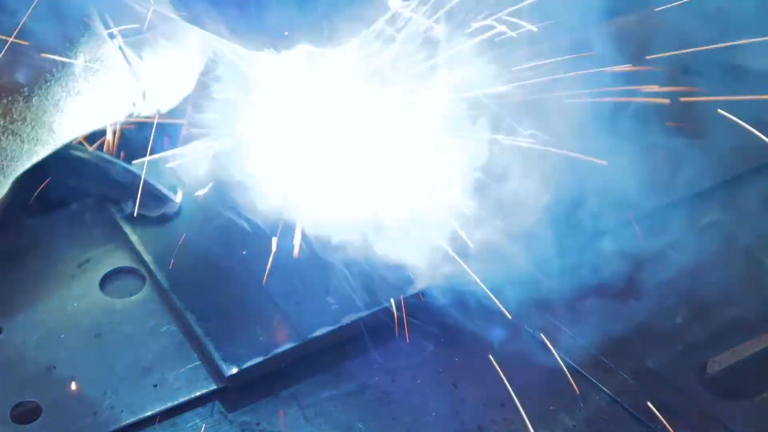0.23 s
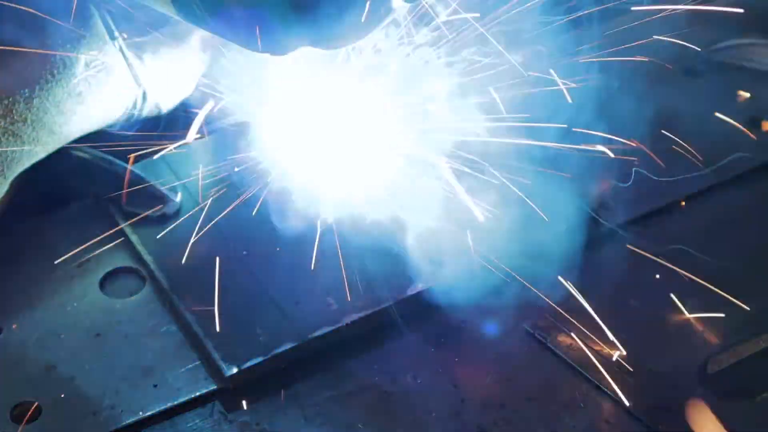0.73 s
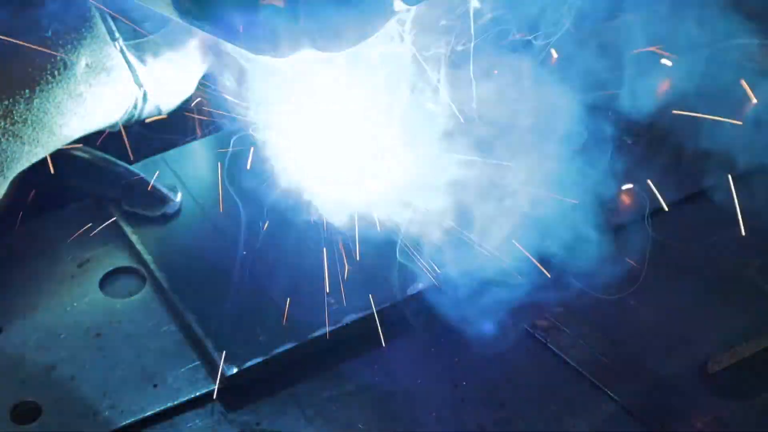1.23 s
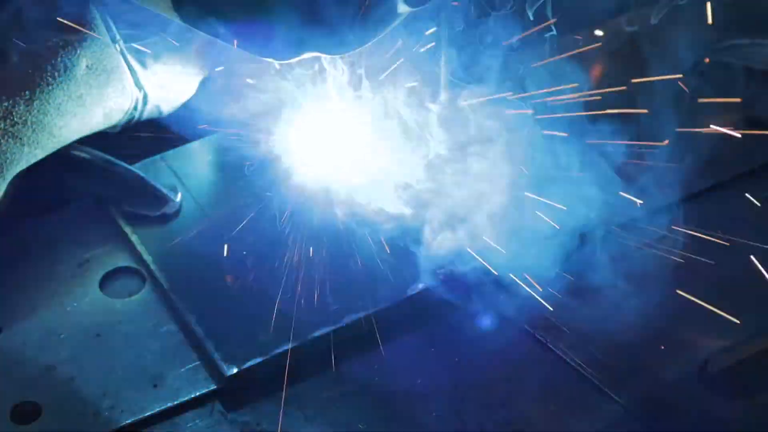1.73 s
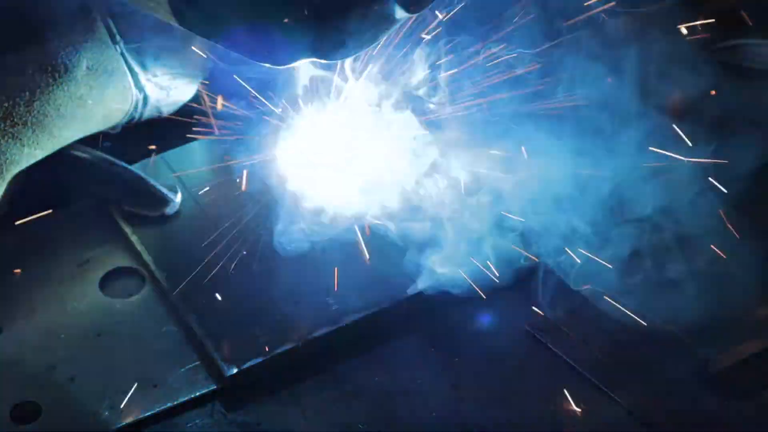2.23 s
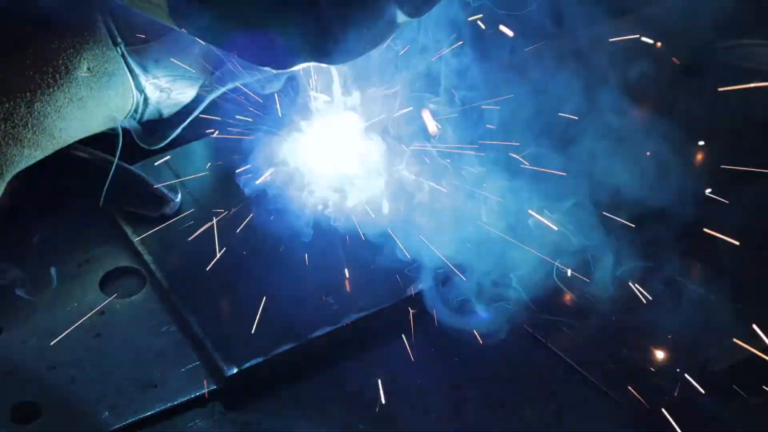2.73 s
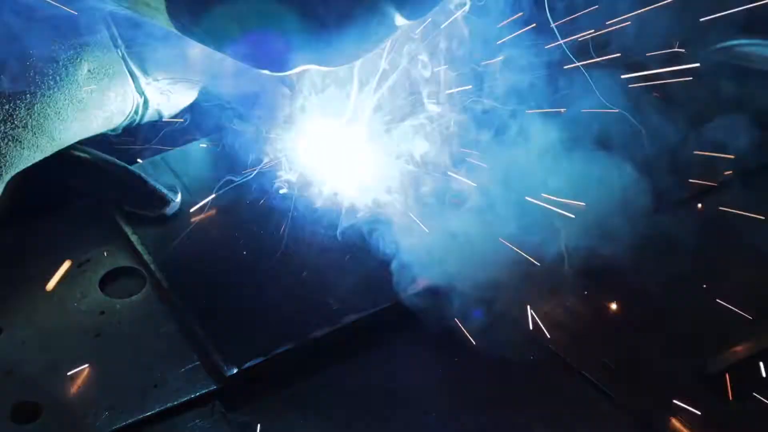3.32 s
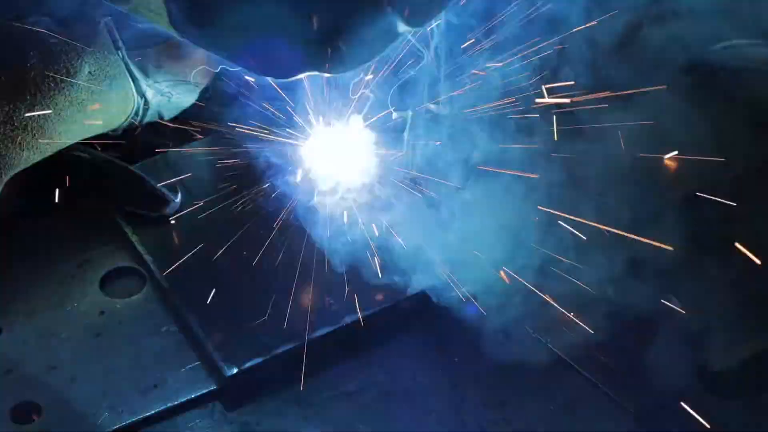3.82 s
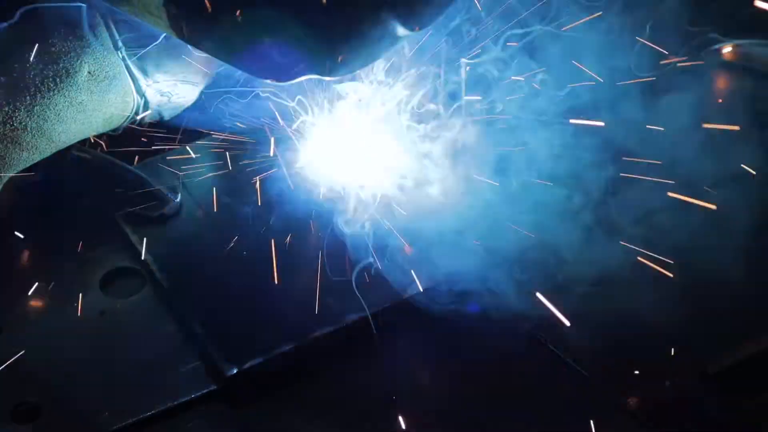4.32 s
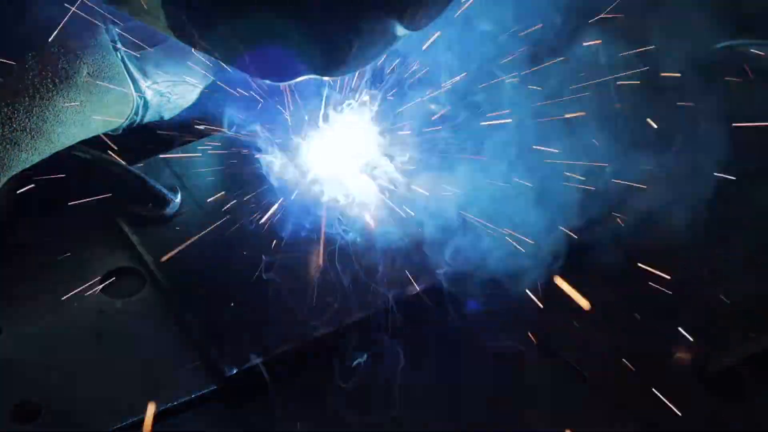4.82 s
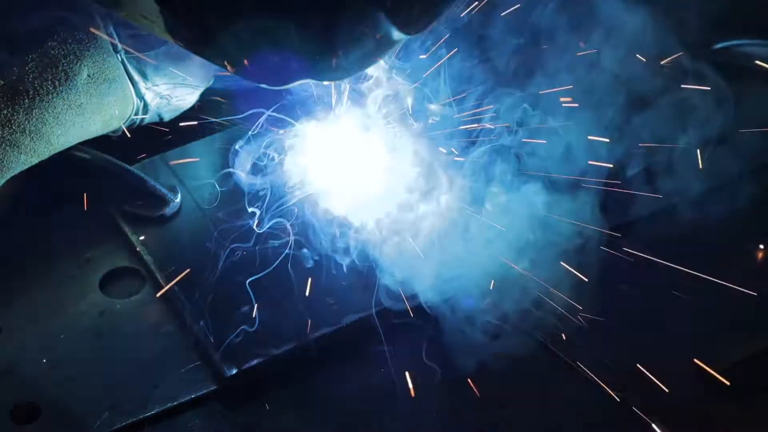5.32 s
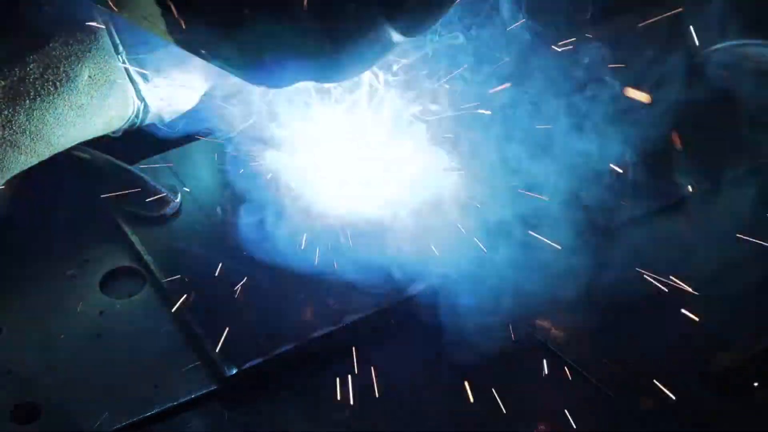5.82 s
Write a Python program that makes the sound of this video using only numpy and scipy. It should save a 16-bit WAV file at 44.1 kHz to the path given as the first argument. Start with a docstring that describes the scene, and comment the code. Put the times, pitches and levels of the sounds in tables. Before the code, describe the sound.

A close welding arc crackles and sizzles with irregular dull pops, cuts out for an instant, then resumes with steadier, brighter frying.

```python
"""A workshop, close to a MIG welder laying a bead along a steel joint.
The wire keeps shorting into the pool: each re-ignition is a dull pop with a hard crack, and the pool
rocks, bubbles and rumbles. Between pops the arc spits and sizzles in quick bursts, droplets snap off
the wire and spatter ticks on the steel. After one dead stop the arc strikes again into a steadier,
brighter frying. Faint room tail and air lie behind."""
import sys
import numpy as np
from scipy import signal
from scipy.fft import irfft
from scipy.io import wavfile
from scipy.ndimage import uniform_filter1d, map_coordinates

SR = 44100
rng = np.random.default_rng(int(sys.argv[2]) if len(sys.argv) > 2 else 0)


def store_wav(level_fs):
    """Save 16-bit WAV to argv[1]."""
    pcm = np.round(np.clip(np.atleast_2d(level_fs), -1, 1) * 32767)
    wavfile.write(sys.argv[1], SR, pcm.T.astype(np.int16))


N = 267687
TIME = np.arange(N) / SR
DEAD_S, RESTRIKE_S = 4.692, 4.723
IS_STEADY = TIME > RESTRIKE_S


# Each row: start in seconds, body level in dB, left minus right in dB, crack level in dB.
REIGNITIONS = [(0.0196, -21.5, 5, -59), (0.0435, -19.5, -3, -30), (0.0829, -13, -3.5, -27),
               (0.1104, -10.5, 5, -30.5), (0.1153, -18.5, -5.0, -40), (0.1294, -18, 0, -28),
               (0.1437, -14, -16, -32), (0.264, -17, -0.5, -30), (0.3074, -15.5, 7, -29),
               (0.314, -22, -12, -39), (0.3231, -12.5, -2, -28.5), (0.3543, -16.5, -4, -34),
               (0.3602, -20, -4, -30.5), (0.447, -15, 3, -32.5), (0.4519, -13, -2, -36),
               (0.4543, -14.5, 0, -25.5), (0.561, -22.5, 9, -50), (0.5844, -21.5, 13, -45),
               (0.5886, -19.5, 10.0, -39), (0.6623, -18, 6.5, -31), (0.6692, -21, 1, -38),
               (0.8365, -17.5, 3, -46), (0.8793, -13, 1, -32), (0.907, -14.5, 0.0, -28),
               (0.934, -21, -7, -37), (0.942, -26, 7, -43), (1.0493, -23, 7.0, -49), (1.0716, -12, -1, -33),
               (1.1297, -23, -4, -40), (1.1408, -22, -8, -32.5), (1.2647, -18.5, 9, -41),
               (1.3812, -22, 10, -47), (1.4843, -24, -7, -29.5), (1.519, -18, 5, -32.5),
               (1.5718, -22, 4, -38), (1.6249, -16, 5, -28.5), (1.666, -11, 2, -25.5),
               (1.6717, -21, -6, -27), (1.6877, -16.5, -2.0, -36), (1.7222, -19, 5, -24),
               (1.73, -13.5, -3.5, -24), (1.764, -17, -2, -24), (1.768, -11, -1, -24.5),
               (1.792, -14, -11, -32), (1.8173, -12.5, 4.5, -27.5), (1.8199, -13.5, 2, -31),
               (1.8533, -14.5, -1.5, -30), (1.8758, -22, -3.0, -50), (1.9161, -18, -1, -38),
               (1.9674, -11.5, -0.5, -27.5), (1.9897, -20, -6, -28), (2.0052, -14.5, 1, -27.5),
               (2.027, -24, -5, -42), (2.0815, -14, -1, -33), (2.2059, -22, -2, -42),
               (2.2469, -13.5, -2.5, -31), (2.2483, -11.5, 9, -30), (2.255, -25, -4, -41),
               (2.2651, -22, 10, -32), (2.272, -21, 9, -36), (2.3195, -15.5, 5, -34),
               (2.3241, -18.5, 5, -27), (2.3704, -23, 6, -35), (2.3931, -17.5, -1, -33),
               (2.409, -14.5, 4, -26), (2.4127, -16.5, 1, -36), (2.607, -19.5, -5, -22.5),
               (2.657, -20, -1.0, -35), (2.6654, -20.5, -4, -28), (2.6816, -11.5, 2.5, -28.5),
               (2.9111, -13, 7.5, -30), (2.9195, -18, -17, -31), (2.9454, -18, 0.0, -29.0),
               (2.9503, -18, -8, -26.5), (3.0342, -15, 0.5, -28.5), (3.0673, -10.5, 2.5, -26.5),
               (3.1034, -15.5, 1.5, -31), (3.1066, -23, 7, -29.5), (3.1333, -23.5, 3, -32),
               (3.1805, -18.5, 7, -30), (3.24, -20, 1, -48), (3.2775, -20.5, 1.5, -58),
               (3.3566, -15.5, -15, -43), (3.4298, -23, 5, -36), (3.5986, -13, -2, -24.5),
               (3.6486, -24.5, 7, -27), (3.6786, -15.5, 1, -21), (3.708, -11.5, 4, -26),
               (3.7569, -13.5, 4, -20), (3.797, -15, 0, -27), (3.8005, -8.5, 3, -25.5),
               (3.8142, -21, 3, -28), (3.9211, -21.5, -6, -29), (3.9292, -17.5, 6, -25),
               (3.935, -19, -28, -36.0), (3.9819, -19, -2.5, -26), (4.0665, -15.5, 6, -21),
               (4.0719, -15, 6.0, -30), (4.1099, -11.5, 5.5, -29.5), (4.1258, -20.5, 7, -27.5),
               (4.2136, -18, 1.5, -29.5), (4.3216, -17.5, 0, -20), (4.3812, -25, 6, -32),
               (4.3996, -20, 5, -30.5), (4.4456, -18, 0, -30), (4.4572, -18.5, 4, -28),
               (4.4736, -15.5, 2, -28.5), (4.5585, -11, 0.5, -23.5), (4.602, -13, -2.5, -24),
               (4.6126, -28, 4, -24.5), (4.6328, -18, -1, -28), (4.639, -14, 8, -28.5),
               (4.683, -16, 0.5, -32.5), (4.7249, -14, 8, -27), (4.7598, -20.5, -2, -29),
               (4.7755, -16.5, 4, -27), (4.7802, -12, 4.0, -22), (4.788, -14.5, -5, -33),
               (4.806, -14.5, 0, -25), (4.8102, -14, 6, -24), (4.8443, -22, 15, -27.5),
               (4.8907, -20, 4, -40), (4.9011, -24, 14, -33), (4.935, -19, 6, -35.0),
               (4.9395, -25, 15, -27), (4.9482, -13, 4, -29), (4.9589, -16, -5, -27),
               (4.9736, -19, -3, -30), (5.0026, -19.5, 4, -22.5), (5.0962, -18.5, -4.5, -35),
               (5.0993, -16.5, -1.5, -26), (5.1328, -19.5, -3.0, -28.5), (5.1781, -15.5, -3, -30),
               (5.2541, -18.5, 1.5, -27.5), (5.332, -16, -0.5, -30.5), (5.461, -19, 6, -27),
               (5.466, -22, -2, -33), (5.5128, -17, -1.5, -28), (5.5361, -21, 0.0, -37),
               (5.546, -27, 0, -40), (5.7567, -28.5, -5, -41), (5.8135, -23, -5, -38),
               (5.8858, -19, -3, -31.5), (5.906, -25.5, 0, -41)]

def pops(crack_db=-0.5, delay_s=0.00024, rock_db=-16, rock_s=0.009):
    """Each re-ignition swells and cracks; a softer pop follows as the pool rocks back."""
    out = np.zeros((2, N))
    draws = rng.standard_normal((len(REIGNITIONS), 12, 2))
    for (start, db, pan_db, edge_db), draw in zip(REIGNITIONS, draws):
        pop = swell(draw[:4], db) + crack(draw[9:], edge_db + crack_db)
        add(out, start + delay_s, panned(pan_db) * pop)
        late, size = np.clip(draw[8], -2, 2)
        add(out, start + rock_s * np.exp(late / 2), swell(draw[4:8], db + rock_db + 2 * size))
    return out


def small_pops(level_db=7, crack_db=-13, gap_s=0.025, spread_db=3, pan_db=3, pan_spread_db=4):
    """Lesser re-ignitions at uneven intervals, as strong as the pool is lively."""
    out, draws = np.zeros((2, N)), rng.standard_normal((300, 9, 2))
    starts = np.cumsum(gap_s * np.exp(0.7 * draws[:, 5, 0]))
    for start, draw in zip(starts, draws):
        size, side = np.clip(draw[4], -2, 1.5)
        db = np.interp(start, *np.transpose(POOL_ACTIVITY)) + level_db + spread_db * size
        pop = swell(draw[:4], db) + crack(draw[6:], db + crack_db)
        add(out, start, panned(pan_db + pan_spread_db * side) * pop)
    return out


def swell(draw, db, mid_turn_hz=480, lag_spread_s=0.00033, echo=0.4, echo_s=0.001396):
    """Body of a pop: it reaches each side with its own shape and echo off the steel."""
    size, turn, bounce, path = np.clip(draw, -2, 2)[:, :, None]
    stretch = np.exp(0.16 * (size[0] + 0.5 * size[::-1]))
    turn_hz = mid_turn_hz * np.exp(0.25 * turn)
    lag_s = np.maximum(lag_spread_s * (path - path[::-1]), 0)
    reflected = echo * bounce * gas_pulse(stretch, turn_hz, lag_s + echo_s * np.exp(path / 2))
    return gain_of(db) * equal_energy(gas_pulse(stretch, turn_hz, lag_s) + reflected)


def crack(draw, db, first_s=0.0001, apart_s=0.000604, turn_hz=900):
    """Edge of a pop: the neck of molten wire tears in three quick, uneven snaps."""
    size, gap, share = np.clip(draw, -2, 2)[:, :, None]
    stretch = np.exp(0.52 * size)
    tears = [(first_s, 1),
             (first_s + apart_s * np.exp(gap / 2), share),
             (first_s + 2 * apart_s * np.exp(share / 2), gap)]
    wave = sum(gain * gas_pulse(stretch, turn_hz, lag_s, low_hz=1120, body_hz=2260, edge_hz=2617, order=8)
               for lag_s, gain in tears)
    return gain_of(db) * equal_energy(wave)


def gas_pulse(stretch, turn_hz, lag_s, low_hz=155, body_hz=310, edge_hz=1400, order=4):
    """A small ball of gas swells and collapses: push, suck, quick rebound."""
    jf = 1j * np.fft.rfftfreq(1024, 1 / SR)
    low = jf * stretch / low_hz
    spectrum = low ** 2 / (low ** 2 + low + 1) / (1 + jf * stretch / body_hz)
    spectrum /= np.polyval(signal.butter(order, 1, analog=True)[1], jf / edge_hz)
    spectrum *= (jf - turn_hz) / (jf + turn_hz)  # all-pass: lows trail in a falling "pew"
    return equal_energy(irfft(spectrum * np.exp(-2 * np.pi * jf * lag_s)))


# Frying, its added tilt in the steady arc, top hiss. Each row: frequency in Hz, relative gain in dB.
SIZZLE_SPECTRUM = [(60, -33), (400, -0.5), (900, 0.5), (1400, -3), (2000, -1), (2600, 1), (3200, -3),
                   (3850, 2.5), (4150, -2), (4750, -5.5), (5200, 3.5), (6000, -9), (6450, -1), (7050, -6),
                   (7800, -1.5), (9200, -2.5), (10100, -6.5), (11100, -2), (12600, -6.5), (13500, -12.5),
                   (14300, -31), (15800, -29)]
STEADY_TILT = [(250, -4), (900, -1), (3200, -0.5), (12000, 2)]
FIZZ_SPECTRUM = [(200, -55), (9500, -30), (10900, -2), (11650, 10), (12400, -7), (13300, -15), (14500, -30),
                 (16000, -34)]

def sizzle(drops, clicks_per_s=8000, spread_db=3, level_db=2.5, waver_db=2, fizz_pan_db=-8, spots=8):
    """Tiny clicks from many spots of the pool, in bursts, with a thin hiss on top."""
    spot = rng.integers(0, spots, N)
    clicks = np.sign(rng.standard_normal(N)) * gain_of(spread_db * np.minimum(rng.exponential(1, N), 4))
    clicks *= rng.random(N) < clicks_per_s / SR
    strength = arc_strength(drops)
    scattered = sum(steel_scatter(clicks * (spot == k)) for k in range(spots))
    grains = flicker(nozzle_echo(scattered) * strength)
    grains = np.where(IS_STEADY, coloured(grains, STEADY_TILT), grains)
    frying = gain_of(level_db) * coloured(grains, SIZZLE_SPECTRUM)
    fizz = coloured(strength * rng.standard_normal((2, N)), FIZZ_SPECTRUM)
    fizz_db = frying_db(column=2) - frying_db() + waver_db * wavering()
    return frying + panned(fizz_pan_db) * gain_of(fizz_db) * fizz


# Loud spits of molten metal. Each row: time in seconds, relative level in dB.
METAL_SPITS = [(1.2174, -24.5), (1.326, -27.5), (1.3819, -20.5), (1.403, -30), (1.422, -24), (1.574, -25.5),
               (1.644, -21.5), (1.687, -23), (2.14, -26), (2.5714, -27), (2.6059, -22), (2.75, -22),
               (3.1797, -25.5), (3.255, -29), (3.278, -27), (3.353, -20.5), (3.411, -27), (3.429, -17.5),
               (3.586, -20), (3.599, -19.5), (3.728, -22.5), (3.8898, -23), (3.913, -24.5), (3.985, -29),
               (4.034, -27.5), (4.531, -21.5), (5.0988, -20), (5.179, -26), (5.2165, -21.5), (5.299, -17.5),
               (5.977, -13.5), (6.012, -18.5)]

def arc_strength(drops, bed_db=-1.5, burst_db=6, spit_db=-8, spit_lead_s=0.0012, spray_db=-10.5,
                 flare_db=6.5, flare_s=0.07, steady_flutter=0.72, gas_db=-59):
    """Sizzle envelope: a bed, a burst per droplet, loud spits and a spray per pop, summed as power."""
    bursts, spits = np.zeros((2, N))
    flash = burst(0.0008, 0.002)
    for start, db in drops:
        add(bursts, start, (gain_of(db + burst_db) * flash) ** 2)
    for start, db in METAL_SPITS:
        add(spits, start - spit_lead_s, (gain_of(db + spit_db) * burst(0.0019, 0.003)) ** 2)
    for start, _, _, db in REIGNITIONS:
        add(spits, start, (gain_of(db + spray_db) * burst(0.0005, 0.0032)) ** 2)
    fresh_arc_db = flare_db * IS_STEADY * np.exp(-abs(TIME - RESTRIKE_S) / flare_s)
    flutter = (gain_of(bed_db) ** 2 + bursts) ** np.where(IS_STEADY, steady_flutter, 1)
    frying = (burning() * gain_of(frying_db() + fresh_arc_db)) ** 2 * flutter
    return np.sqrt(frying + spits + gain_of(gas_db) ** 2)  # shielding gas hisses through the shorts


# Arc before and after the restrike. Each row: time in seconds, relative sizzle and fizz levels in dB.
STUTTERING_ARC = [(0.0, -38.5, -60), (0.26, -48.5, -58), (0.56, -45.5, -62), (1.17, -46.5, -57),
                  (1.33, -44.5, -59), (1.58, -45, -64), (1.72, -45.5, -62), (1.82, -49, -55),
                  (2.18, -46, -52.5), (2.48, -46.5, -53.5), (2.89, -42.5, -41.5), (3.21, -46, -55),
                  (3.39, -43.5, -48), (3.6, -43, -46.5), (3.83, -48.5, -53.5), (3.96, -46, -50),
                  (4.08, -51.5, -61), (4.21, -47.5, -41.5), (4.33, -48.5, -53), (4.41, -42, -38),
                  (4.52, -56, -56.5), (4.68, -43.5, -53)]
STEADY_ARC = [(4.83, -40, -49.5), (4.918, -38.5, -41), (5.178, -39, -49), (5.348, -37.5, -45),
              (5.458, -37.5, -46), (5.796, -34.5, -40.5), (6.07, -36.5, -42)]

def frying_db(column=1):
    """Level of the sizzle (column 1) or fizz (2); the steady arc takes over at the restrike."""
    return np.where(IS_STEADY, follow(STEADY_ARC, column), follow(STUTTERING_ARC, column))


# Wire stuck in the pool. Each row: start in seconds, length in seconds.
WIRE_SHORTS = [(0.738, 0.011), (2.215, 0.061), (2.523, 0.046), (2.583, 0.027), (3.138, 0.031),
               (3.213, 0.035), (3.297, 0.093), (3.573, 0.02), (3.77, 0.024), (3.995, 0.032), (4.333, 0.024),
               (4.479, 0.041), (4.57, 0.035), (4.606, .065), (4.787, 0.019), (5.065, 0.021), (5.147, 0.027),
               (5.186, 0.015), (5.23, 0.018), (5.957, 0.013), (5.986, 0.02)]
# Arc gain just after a pop. Each row: time in seconds, gain in dB (capped at 0 in use).
POP_BLOWDOWN = [(0, -4.5), (2.6, 9.5), (3.2, -0.5), (5.2, 1), (5.5, 2)]

def burning(short_db=-13, blown_after_s=0.0069, blown_s=0.033):
    """Arc gain: it drops while the wire is shorted, and some pops briefly blow it down."""
    shorted, blown = np.zeros((2, N))
    for start, length_s in WIRE_SHORTS:
        add(shorted, start, np.ones(round(length_s * SR)))
    for start, *_ in REIGNITIONS:
        add(blown, start + blown_after_s, np.ones(round(blown_s * SR)))
    db = np.minimum(short_db * np.minimum(shorted, 1), follow(POP_BLOWDOWN) * np.minimum(blown, 1))
    return gain_of(uniform_filter1d(db, size=180))


def dead_stop(depth_db=-35.5, fade_s=0.0092):
    """Gain that fades as the arc dies and jumps back at the restrike."""
    dying = np.clip((TIME - DEAD_S) / fade_s + 0.5, 0, 1) * (TIME < RESTRIKE_S)
    return gain_of(uniform_filter1d(depth_db * dying, size=80))


def steel_scatter(x, scatter_db=2, decay_s=0.001, size=400):
    """Steel around the arc scatters each click for a few ms, differently to each side."""
    t = np.arange(size) / SR
    taps = rng.standard_normal((2, size)) * np.exp(-t / decay_s)
    taps *= gain_of(scatter_db) / np.linalg.norm(taps, axis=1, keepdims=True)
    taps[[0, 1], rng.integers(0, size // 10, 2)] += 1  # direct path
    return signal.oaconvolve(x[None], taps / np.linalg.norm(taps[0]), axes=1)[:, :N]


def nozzle_echo(x, echo=0.19, echo_s=0.000762, weave=0.11):
    """The torch nozzle reflects the frying; the resonances shift as the hand weaves."""
    delays_s = [echo_s * (1 + weave * wavering(low_hz=0.4, high_hz=4)) for _ in x]
    reflected = np.array([map_coordinates(side, [np.arange(N) - delay_s * SR], order=2)
                          for side, delay_s in zip(x, delays_s)])
    return unit_rms(x + echo * reflected)


def flicker(x, depth_db=3):
    """Each burst has its own colour: patches about 1 kHz wide flare for some 10 ms."""
    spectra = signal.stft(x, nperseg=256)[2]
    patches = rng.standard_normal(spectra.shape)
    patches = patches.sum(0) + 0.5 * patches  # mostly common to both sides
    patches = uniform_filter1d(patches, size=7, axis=1)
    patches = unit_rms(uniform_filter1d(patches, size=4, axis=2))
    return signal.istft(spectra * unit_rms(gain_of(depth_db * patches)))[1][:, :N]


def droplets(stuttering_per_s=62, steady_per_s=160, jitter=0.42, spread_db=3.5):
    """Droplets leave the wire at a roughly even pace. Each row: start in seconds, size in dB."""
    gap, size = rng.standard_normal((900, 2)).T
    per_s = np.where(IS_STEADY, steady_per_s, stuttering_per_s)
    starts = np.interp(np.cumsum(np.exp(jitter * gap)), np.cumsum(per_s) / SR, TIME)
    return np.transpose([starts, spread_db * np.clip(size, -2, 1.5)])[starts < TIME[-1]]


# Droplet breaking off. Each row: frequency in Hz, relative gain in dB.
SNAP_SPECTRUM = [(300, -18), (1200, 0), (2700, 0), (5400, 3), (9000, -3.5), (14000, -22)]

def snaps(drops, level_db=4, steady_db=-3.5, delay_s=0.0005):
    """Each droplet breaks off with a metallic snap; in the steady arc they merge into a rasp."""
    out, envelope = np.zeros((2, N)), burst(0.0001, 0.0007)
    noises = rng.standard_normal((len(drops), 3, len(envelope)))
    for (start, db), noise in zip(drops, noises):
        add(out, start + delay_s, gain_of(db) * envelope * unit_rms(noise[:2] + 0.5 * noise[2]))
    strength = burning() * gain_of(frying_db() + level_db + steady_db * IS_STEADY)
    return strength * coloured(coloured(out, SNAP_SPECTRUM), SIZZLE_SPECTRUM)


# How hard the pool bubbles. Each row: time in seconds, relative level in dB.
POOL_ACTIVITY = [(0.0, -33), (0.18, -31), (0.42, -39), (0.96, -36.5), (1.34, -50.5), (1.83, -35.5),
                 (2.67, -42.5), (2.99, -40.5), (3.09, -38), (3.33, -48), (3.5, -38.5), (3.72, -37.5),
                 (4.16, -36.5), (4.78, -33), (5.06, -37), (5.43, -50), (5.58, -46), (5.79, -69),
                 (5.85, -38), (6.07, -45)]

def sputter(level_db=-4, per_s=130, spread_db=10.5, width=0.55):
    """Many small short circuits keep up a low bubbling between the pops."""
    sizes = gain_of(spread_db * np.minimum(rng.exponential(1, (3, N)), 3))
    left, right, both = sizes * (rng.random((3, N)) < per_s / SR)
    clicks = both + width * np.array([left, right])
    bubble = gas_pulse(stretch=1.27, turn_hz=540, lag_s=0)
    bubbling = signal.oaconvolve(clicks, bubble[None], axes=1)[:, :N]
    return gain_of(follow(POOL_ACTIVITY) + level_db) * unit_rms(bubbling)


# Ring of the joint. Each row: frequency in Hz, relative level in dB.
STEEL_MODES = [(3850, 4), (5280, -2)]

def spatter(level_db=8, per_s=26, spread_db=3, t60_s=0.011, detune=0.012):
    """Until the dead stop, small beads fly off and tick on the steel at slightly varied pitches."""
    out, t = np.zeros((2, N)), np.arange(1200) / SR
    bead_db = frying_db() + level_db
    for at in np.flatnonzero((rng.random(N) < per_s / SR) & (TIME < DEAD_S)):
        for hz, db in STEEL_MODES:
            shift, size, side = np.clip(rng.standard_normal(3), -2, 2)
            ring = np.sin(2 * np.pi * (hz * (1 + detune * shift) * t + rng.random((2, 1))))
            envelope = gain_of(bead_db[at] + db + spread_db * size - 60 * t / t60_s)
            add(out, at / SR, panned(spread_db * (1 + side)) * envelope * ring)
    return burning() * out


# Single beads of spatter. Each row: start in seconds, pitch in Hz, level in dB.
BEAD_LANDINGS = [(0.771, 2680, -23), (3.256, 3860, -27.5), (3.278, 3960, -31), (3.353, 3810, -23.5)]

def bead_ticks(t60_s=0.027):
    """A bead lands and the steel rings briefly."""
    out, t = np.zeros((2, N)), np.arange(3000) / SR
    for (start, hz, db), phase in zip(BEAD_LANDINGS, rng.random((len(BEAD_LANDINGS), 2, 1))):
        add(out, start, gain_of(db - 60 * t / t60_s) * np.sin(2 * np.pi * (hz * t + phase)))
    return out


# Heaving pool. Each row: frequency in Hz, relative gain in dB.
RUMBLE_SPECTRUM = [(25, -33), (85, -3), (220, -21), (1000, -67)]

def rumble(level_db=-15, waver_db=1.5):
    """The pool heaves dully and unevenly under its bubbling."""
    db = follow(POOL_ACTIVITY) + level_db + waver_db * wavering()
    return gain_of(db) * coloured(rng.standard_normal((1, N)), RUMBLE_SPECTRUM, size=8192)


# Workshop decay. Each row: frequency in Hz, T60 in seconds.
ROOM_T60 = [(150, 0.007), (1000, 0.24), (4000, 0.13), (12000, 0.014)]

def room(x):
    """Diffuse workshop tail; the mids ring longest."""
    hz, t, spectra = signal.stft(rng.standard_normal((2, SR // 2)), SR, nperseg=256)
    tail = signal.istft(spectra * gain_of(-60 * t / at_hz(ROOM_T60, hz)[:, None]), SR)[1]
    tail *= np.clip(np.arange(tail.shape[1]) / SR / 0.0033, 0, 1)
    return signal.oaconvolve(x, tail / np.linalg.norm(tail[0]), axes=1)[:, :N]


# Workshop air. Each row: frequency in Hz, relative gain in dB.
AIR_SPECTRUM = [(20, -11), (70, -10), (200, -18), (1000, -36), (4000, 4), (16000, -6)]

def air(level_db=-60):
    """Faint, even hiss of the workshop."""
    return gain_of(level_db) * coloured(rng.standard_normal((2, N)), AIR_SPECTRUM)


def gain_of(db):
    return 10 ** (np.asarray(db) / 20)


def unit_rms(x):
    return x / np.sqrt(np.mean(x ** 2) + 1e-20)


def equal_energy(wave):
    return wave / np.sqrt(np.sum(wave ** 2, -1, keepdims=True) / (0.0043 * SR))


def panned(left_minus_right_db):
    return unit_rms(gain_of([[left_minus_right_db / 2], [-left_minus_right_db / 2]]))


def at_hz(rows, hz):
    """Table interpolated on a log-frequency axis."""
    row_hz, value = np.transpose(rows)
    return np.interp(np.log(hz + 1), np.log(row_hz + 1), value)


def follow(rows, column=1):
    """Control curve at every sample."""
    rows = np.array(rows)
    return np.interp(TIME, rows[:, 0], rows[:, column])


def add(mix, start_s, sound):
    part = mix[..., max(round(start_s * SR), 0):][..., :sound.shape[-1]]
    part += sound[..., :part.shape[-1]]


def coloured(x, spectrum, size=2048):
    """Minimum-phase filter of unit energy: clicks keep their sharp fronts."""
    log_gain = np.log(gain_of(at_hz(spectrum, abs(np.fft.fftfreq(size, 1 / SR)))))
    taps = np.fft.ifft(np.exp(np.conj(signal.hilbert(log_gain)))).real[:size // 2]
    return signal.oaconvolve(x, taps[None] / np.linalg.norm(taps), axes=1)[:, :N]


def burst(rise_s, fall_s):
    """Envelope of one spit, peak 1."""
    t = np.arange(1800) / SR
    shape = (1 - np.exp(-(t / rise_s) ** 2)) * np.exp(-t / fall_s)
    return shape / shape.max()


def wavering(low_hz=5, high_hz=16, count=24):
    """Slow random drift, unit RMS."""
    rates_hz = np.geomspace(low_hz, high_hz, count)
    t = np.linspace(0, N / SR, 1200)
    drift = np.sin(2 * np.pi * (rates_hz * t[:, None] + rng.random(count))).sum(1)
    return unit_rms(np.interp(TIME, t, drift))


def scene(pop_room_db=-22, frying_room_db=-14):
    """The weld close by, over the workshop; the dead stop ducks all but the loud pops."""
    alive, arc, drops = dead_stop(), burning(), droplets()
    thumps = pops() + alive * arc * small_pops()
    frying = sizzle(drops) + snaps(drops) + spatter() + bead_ticks()
    workshop = gain_of(pop_room_db) * room(thumps) + gain_of(frying_room_db) * room(frying) + air()
    pool = arc * (sputter() + rumble())
    return thumps + alive * (frying + pool + workshop)


def record(dry, cutoff_hz=15900):
    """Clip at full scale, then low-pass."""
    lowpass = signal.firwin(255, cutoff_hz, window=("kaiser", 9), fs=SR)
    return signal.oaconvolve(np.clip(dry, -1, 1), lowpass[None], "same")


dry = scene()
out = record(dry)
store_wav(out)
```